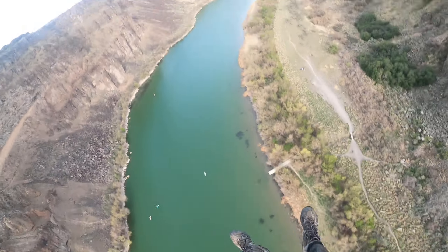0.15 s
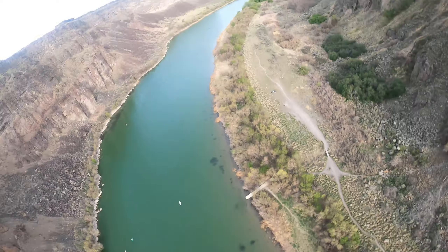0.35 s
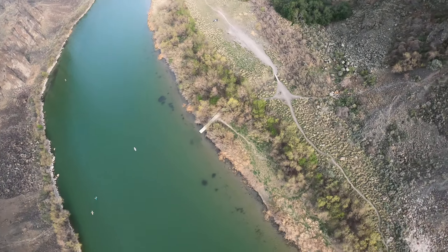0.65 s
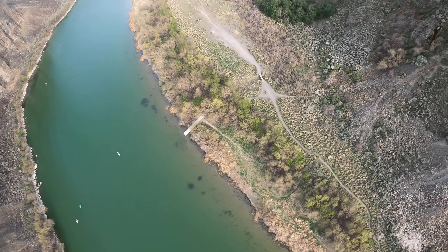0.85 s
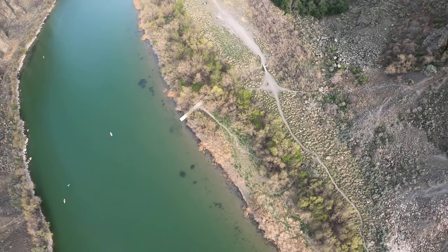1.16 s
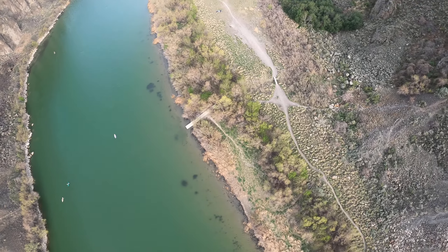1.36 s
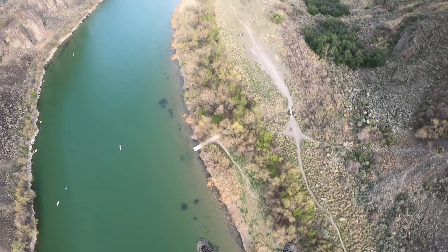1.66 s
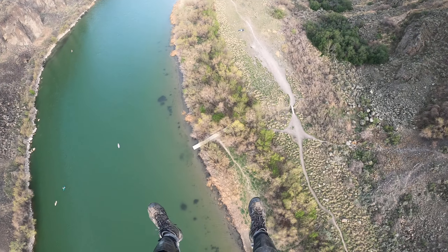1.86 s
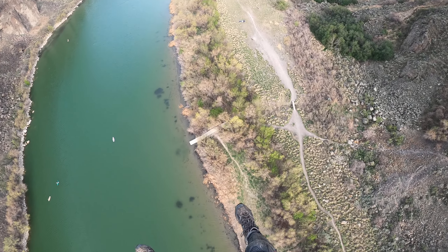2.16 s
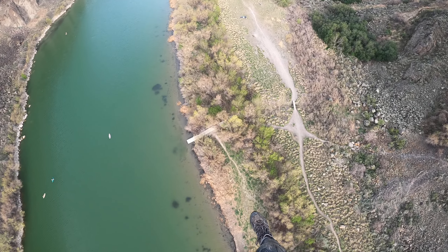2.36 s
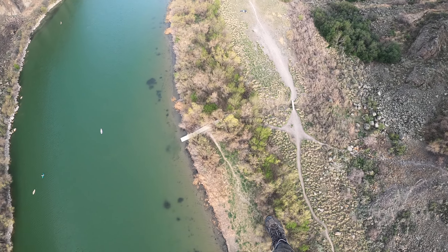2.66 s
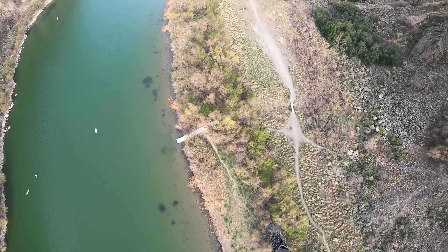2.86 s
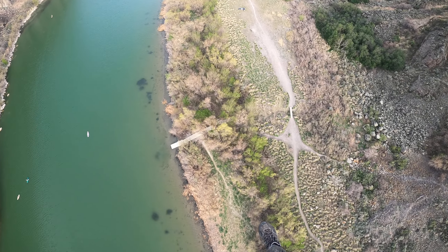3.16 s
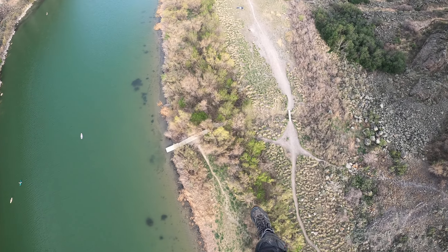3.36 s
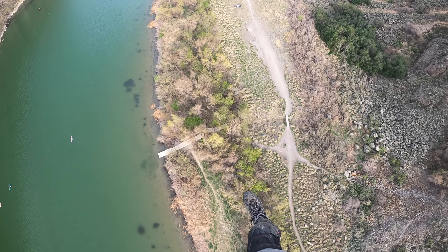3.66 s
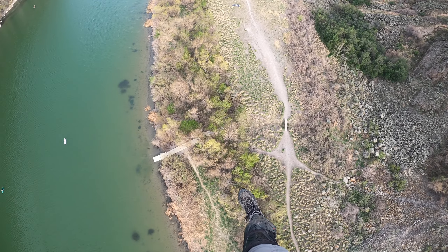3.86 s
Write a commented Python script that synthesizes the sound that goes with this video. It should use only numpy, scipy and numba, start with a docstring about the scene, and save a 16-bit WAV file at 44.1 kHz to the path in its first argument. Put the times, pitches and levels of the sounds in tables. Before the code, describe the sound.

Close, outdoor wind noise: a rough, snapping burst at first, quickly falling to quiet, fluttering air with small strap ticks, a sharp clack with a low thump, then rushing air rising to the end.

```python
"""Air buffets the microphone ports of a helmet camera under a parachute that has just opened: low, flickering noise.
The air also hisses through the housing, harder as the glide gains speed: noise coloured by ringing cavities.
The opening shakes the rig, heard as tearing noise, and fabric and straps snap in short noise bursts.
One buckle knocks: a crack, ringing tones and a low thump. The recorder's limiter ducks the hiss after it."""
import sys
import numpy as np
from scipy import signal
from scipy.fft import rfft, irfft
from scipy.io import wavfile
from scipy.ndimage import uniform_filter1d
from numba import njit

SR = 44100
rng = np.random.default_rng(int(sys.argv[2]) if len(sys.argv) > 2 else 0)


def waveform_to_disk(signal):
    """Save audio, clipped to [-1, 1], as 16-bit WAV at the path in sys.argv[1]."""
    frames = np.transpose(np.atleast_2d(signal))
    scaled = np.clip(frames, -1, 1) * 32767
    samples = np.round(scaled).astype(np.int16)
    wavfile.write(sys.argv[1], SR, samples)


def nominal_scale(level):
    """Amplitude ratio for a level in decibels (scalar or array-like)."""
    x = np.asarray(level, float) / 20
    return 10 ** x


N = 176400  # samples, 4 s


def shape(table, tilt=0., lift=0):
    """Gain per frequency from a (Hz, dB) table, tilted above 1600 Hz, with cavity lifts (column 2 or 3) if asked."""
    # Cavities of the housing: (centre [Hz], width [Hz], lift in common [dB], lift in the difference [dB])
    cavities = [(1136, 79, 7, 2), (1457, 74, 4, 9), (2070, 45, -1.5, 4.5), (3150, 158, 14, 7.5),
                (3950, 30, 6, 7), (4156, 74, 14.5, 15.5), (4540, 82, 7, 4), (4830, 47, 8, 6.5)]
    f = np.maximum(np.fft.rfftfreq(N, 1 / SR), 1)
    hz, level = np.array(table).T
    db = np.interp(np.log(f), np.log(hz), level)
    db = db + tilt * np.log2(np.maximum(f, 1600) / 1600)
    if lift:
        for cavity in cavities:
            centre, width = cavity[0], cavity[1]
            db = db + cavity[lift] / (1 + (2 * (f - centre) / width) ** 2)
    return nominal_scale(db)


def unit(x):
    """Scale to an average (rms) level of 1."""
    return x / np.sqrt(np.mean(x ** 2))


def noise(table):
    """Steady noise with the colour of a (Hz, dB) table."""
    white = rfft(rng.standard_normal(N))
    return unit(irfft(white * shape(table), N))


def walk(rate):
    """Smooth random wander: `rate` new levels a second, each held and then smoothed twice; spread near 1."""
    hold = int(SR / rate)
    steps = np.repeat(rng.standard_normal(N // hold + 1), hold)
    smooth = uniform_filter1d(uniform_filter1d(steps, hold), hold)
    return 1.3 * smooth[:N]


def curve(tables, column):
    """Join tables that start with a time and draw one column as a value per sample."""
    rows = np.vstack(tables)
    return np.interp(np.arange(N) / SR, rows[:, 0], rows[:, column])


def bands(x):
    """Split a sound into overlapping bands, half an octave apart, that add up to it: (centre in Hz, sound)."""
    octave = np.log2(np.maximum(np.fft.rfftfreq(N, 1 / SR), 1))
    spectrum = rfft(x)
    for centre in np.arange(4, 14, .5):
        weight = np.clip(1 - 2 * np.abs(octave - centre), 0, 1)
        yield 2 ** centre, irfft(spectrum * weight, N)


@njit
def follow(x, attack, release):
    """Follow a level upward and downward at separate speeds (share of the gap closed per sample)."""
    level, out = 0., np.empty(len(x))
    for i in range(len(x)):
        speed = attack if x[i] > level else release
        level += (x[i] - level) * speed
        out[i] = level
    return out


def eddies():
    """Low pressure eddies whose bands flicker alone, peaks rounded by the diaphragm; mid at rms 1, and side."""
    # Eddies common to both ports, and differing between them: (frequency [Hz], level [dB per Hz])
    common_colour = [(8.8, -53), (15, -6), (32, -6.5), (63, 2.5), (76, 3.5), (124, -4), (225, -10.5),
                     (258, -16.5), (304, -25), (400, -26), (520, -58.5), (880, -120)]
    differing_colour = [(8.8, -48), (15, -20.5), (70, 0), (124, -10.5), (193, -5), (255, 3.5), (432, -11),
                        (500, -13), (650, -49), (1100, -120)]
    side_db, flicker_db, rounding = -22, 1.2, 0.31
    pair = np.array([noise(common_colour), nominal_scale(side_db) * noise(differing_colour)])
    pressure = 0
    for hz, band in bands(pair):
        if hz < 700:
            pressure = pressure + nominal_scale(flicker_db * walk(11)) * band
    pressure = np.tanh(rounding * pressure / np.std(pressure[0]))
    return pressure / np.std(pressure[0])


def buffet(pressure):
    """Air beating on the ports: the eddies at a level that changes with time."""
    # Buffeting before and after the knock, two parts: (time [s], level [dB])
    buffet_levels = [
        [(0, -14), (.17, -14.5), (.22, -9), (.3, -10), (.32, -26), (.38, -16.5), (.48, -30.5), (.53, -17.5),
         (.555, -36.5), (.62, -39.5), (.75, -41), (.97, -31.5), (1.09, -38), (1.2, -30), (1.3, -34),
         (1.43, -35.5), (1.47, -28), (1.58, -31.5), (1.67, -28), (1.8, -26)],
        [(1.96, -31), (2.14, -29), (2.15, -27), (2.28, -28.5), (2.33, -23.5), (3.03, -18), (3.96, -20),
         (4.0, -18)],
    ]
    return pressure * nominal_scale(curve(buffet_levels, column=1))


def housing(share, tilt=0.):
    """Mid and side noise in the colour of the housing, its cavities ringing by a share from 0 to 1."""
    # Colour in common to both ports, and differing between them: (frequency [Hz], level [dB per Hz])
    common_colour = [(150, -31.5), (260, -1.5), (310, -15), (510, -9.5), (850, -18), (1000, -9),
                     (1280, -12), (1680, -11.5), (1900, -21.5), (2800, -29), (3400, -22.5), (3800, -26.5),
                     (4350, -33), (4800, -26), (5300, -24.5), (6000, -44.5), (6400, -38.5), (7200, -50.5),
                     (8600, -60), (16000, -93)]
    differing_colour = [(150, -27.5), (260, -0.5), (440, -20), (750, -10.5), (1180, -14), (1710, -16),
                        (2360, -18), (2780, -32.5), (3400, -22), (4500, -20), (5300, -27), (5900, -29),
                        (6600, -43), (8600, -57.5), (16000, -89)]
    side_db = -7.5
    pair = []
    for table, lift in (common_colour, 2), (differing_colour, 3):
        air = rfft(rng.standard_normal(N))
        plain = irfft(air * shape(table, tilt), N)
        sung = irfft(air * shape(table, tilt, lift), N)
        pair.append((plain + share * (sung - plain)) / np.std(sung))
    return np.array(pair) * nominal_scale(np.array([[0], [side_db]]))


def hiss(pressure):
    """Air rushing through the housing: gusts move all bands, patches move neighbours, a flicker moves each."""
    # Hiss before and after the knock, two parts:
    # (time [s], level before flicker and throb [dB], brightness above 1600 Hz [dB per octave])
    hiss_levels = [
        [(.3, -33, -2.5), (.36, -36, -2.5), (.4, -35, -0.5), (.46, -38, 1.5), (.55, -39, 0), (.63, -48, -0.5),
         (.78, -49, -3.5), (.95, -51, 2), (1.07, -51, -5), (1.35, -55, -4.5), (1.44, -47, -1.5),
         (1.62, -45.5, -4), (1.72, -46, 6), (1.8, -43.5, -3.7)],
        [(1.9, -46.5, -3), (2.1, -45, -2), (2.3, -38.5, -3.5), (2.44, -36, -3.5), (2.52, -36, 0.5),
         (2.73, -34.5, 1.3), (3.05, -32, 1.57), (4, -31, -1.6)],
    ]
    # How strongly the airflow makes the cavities sing: (time [s], share [0-1])
    singing = [(.3, .08), (.6, .12), (1.05, .05), (1.25, .3), (1.42, .8), (1.8, .7), (2.1, .4), (2.5, .95),
               (4, .97)]
    gust_db, patch_db, flicker_db = .9, .7, 1.3
    throb = 0.28  # how much the eddy pressure swells the hiss
    low_sag = 0.17  # change below 900 Hz, in dB per dB that the hiss level lies from -35 dB
    air = housing(curve([singing], column=1))
    level, tilt = curve(hiss_levels, column=1), curve(hiss_levels, column=2)
    gust, patch = walk(14), walk(2.9)
    out = 0
    for hz, band in bands(air):
        if hz > 200:
            patch = .8 * patch + .6 * walk(6)  # stays similar from one band to the next
            db = gust_db * gust + patch_db * patch + flicker_db * walk(25)
            db = db + tilt * max(np.log2(hz / 1600), 0)
            if hz < 900:
                db = db + low_sag * (level + 35)
            out = out + nominal_scale(db) * band
    return out * (1 + throb * np.abs(pressure)) * nominal_scale(level)


def shake(pressure):
    """Tearing air that swells with the eddy pressure and fades as the canopy settles."""
    # Colour of the tearing air: (frequency [Hz], level [dB per Hz])
    tearing_colour = [(88, -27.5), (150, -2), (330, -9.5), (750, -16.5), (940, -10.5), (1290, -24.5),
                      (1610, -15), (2110, -30), (3090, -36.5), (5300, -49), (6600, -54), (9000, -64),
                      (16000, -88.5)]
    base_db, swell_db, side_share = -25, 4, .4
    end_s, release_s = .255, .02
    t = np.arange(N) / SR
    fade = np.exp(-np.maximum(t - end_s, 0) / release_s)
    swell = nominal_scale(base_db + swell_db * walk(49))
    pair = np.array([noise(tearing_colour), side_share * noise(tearing_colour)])
    return pair * fade * swell * (0.88 + np.abs(pressure))


def snaps():
    """Fabric and straps snapping: short noise bursts in the housing's colour, each with its own brightness."""
    # Snaps: (time [s], level before the rise and fall [dB], brightness above 1600 Hz [dB per octave],
    # decay time [s])
    snap_list = [(0.046, -28, 9, .004), (0.08, -15.5, -8, 0.011), (0.123, -11.5, -5.5, 0.02),
                 (0.151, -9, -0.5, 0.0097), (.195, 0, -1, .002), (0.201, -9.5, -3.7, 0.009),
                 (0.232, -4.5, -4.5, 0.0018), (0.241, -5, -13, .01), (0.271, 0, -13.5, 0.0055),
                 (0.296, -13.5, -8.5, 0.009), (0.388, -17, -7, .004), (.662, -40.5, 6, 0.009),
                 (0.846, -45, 3, .005), (1.25, -45, 1, .008), (1.29, -51, 9, 0.0033),
                 (1.438, -43.5, 7.5, 0.022), (1.561, -38.5, 5.5, 0.014), (1.699, -33, 3, 0.022),
                 (1.739, -30, 5, 0.0069), (1.787, -24.5, -3.5, 0.0015), (1.945, -44.5, 11, .003)]
    sing_share, rise_share = 0.48, .6  # cavity ringing; rise time as a share of the decay time
    out, t = np.zeros((2, N)), np.arange(N) / SR
    for start, db, tilt, length in snap_list:
        age = np.maximum(t - start, 0) / length
        envelope = (1 - np.exp(-age / rise_share)) * np.exp(-age)
        out += envelope * nominal_scale(db) * housing(sing_share, tilt)
    return out


def ring(age, hz, db, t60):
    """One fading tone that loses 60 dB in t60 seconds."""
    return nominal_scale(db - 60 * age / t60) * np.sin(2 * np.pi * hz * age)


def knock():
    """The buckle hits the housing: a noisy crack, ringing tones and the low thump of the swinging mount."""
    # Ringing tones: (frequency [Hz], level before the soft onset [dB], time to lose 60 dB [s])
    ringing = [(1202, -19, 0.031), (1290, -13, 0.044), (1690, -4, .045), (1860, -29.5, 0.12),
               (2156, -13.5, 0.033), (2730, -9.5, .03), (2590, -29, 0.069), (3020, -10.5, 0.025),
               (3570, -36.5, 0.14), (3700, -37, 0.13), (4230, -25, 0.016), (4970, -31, 0.026)]
    # Colour of the crack: (frequency [Hz], level [dB per Hz])
    crack_colour = [(300, -25), (700, -9.5), (1300, 4), (2500, -0.5), (3700, -6), (5000, -22.5),
                    (8000, -36), (16000, -44.5)]
    knock_s, rise_s = 1.8188, .0008
    crack_db, crack_decay_s = 1.5, .0024
    thump_lead_s = 0.0033  # the thump starts this much earlier
    t = np.arange(N) / SR - knock_s
    age = np.maximum(t, 0)
    crack = nominal_scale(crack_db) * noise(crack_colour) * np.exp(-age / crack_decay_s)
    tones = sum(ring(age, *tone) for tone in ringing)
    click = (tones + crack) * (1 - np.exp(-age / rise_s))
    thump = ring(np.maximum(t + thump_lead_s, 0), hz=70.7, db=-10.5, t60=0.38)
    return np.array([click + thump, .2 * click])


def ports(pair):
    """Turn mid and side into the left and right port."""
    mid, side = pair
    return np.array([mid + side, mid - side])


def scene():
    """Add up the sources and spread them to two ports, each group with its own balance; the left is a sample late."""
    # Balance of hiss, shake and snaps: (frequency [Hz], left over right [dB])
    port_balance = [(60, 3), (100, -2.5), (170, -5.5), (280, 3.5), (470, 6.5), (790, -2), (1310, 3.5),
                    (2200, 1.5), (3680, 4.5), (6150, -3.5)]
    left_db = 0.68  # left over right for the buffeting and the knock
    pressure = eddies()
    high = hiss(pressure[0]) + shake(pressure[0]) + snaps()
    low = buffet(pressure) + knock()
    lean = np.sqrt(shape(port_balance))  # half for each side
    high = irfft(rfft(ports(high)) * np.array([lean, 1 / lean]), N)
    low = nominal_scale(np.array([[left_db], [-left_db]]) / 2) * ports(low)
    left, right = low + high
    return np.array([np.roll(left, 1), right])


def top_cut(x):
    """Nothing passes above the cut-off."""
    return signal.sosfilt(signal.butter(12, 15700, fs=SR, output="sos"), x)


def record(dry):
    """A limiter that listens to the treble turns down all but the bass and recovers slowly; peaks are rounded."""
    split_hz, sense_hz = 324, 930
    limit_db, ratio = -25, 3
    attack_s, release_s, smooth_s = 0.00091, 0.073, 0.0039
    treble_filter = signal.butter(2, sense_hz, "high", fs=SR, output="sos")
    treble = signal.sosfilt(treble_filter, dry.mean(axis=0))
    level = follow(np.abs(treble), 1 / (attack_s * SR), 1 / (release_s * SR))
    excess = np.log(np.maximum(1, level / nominal_scale(limit_db)))
    cut = excess * (1 - 1 / ratio)
    gain = np.exp(-follow(cut, 1 / (smooth_s * SR), 1 / (smooth_s * SR)))
    bass = signal.sosfiltfilt(signal.butter(2, split_hz, fs=SR, output="sos"), dry)
    limited = bass + (dry - bass) * gain
    mix = np.tanh(.7 * limited) / .7
    return top_cut(mix)


dry = scene()
out = record(dry)
waveform_to_disk(out)
```